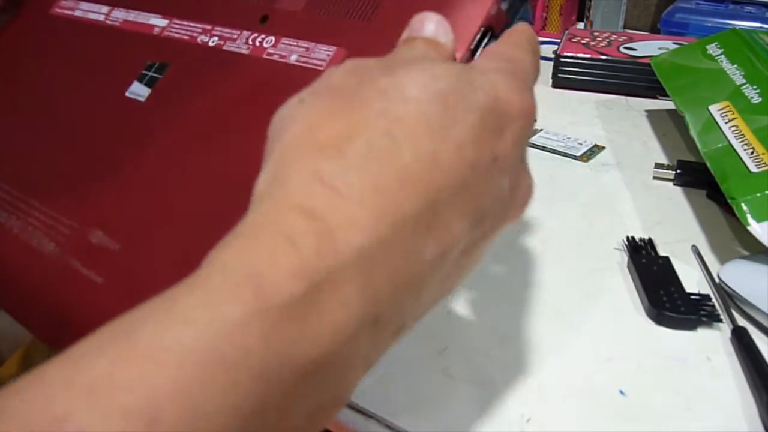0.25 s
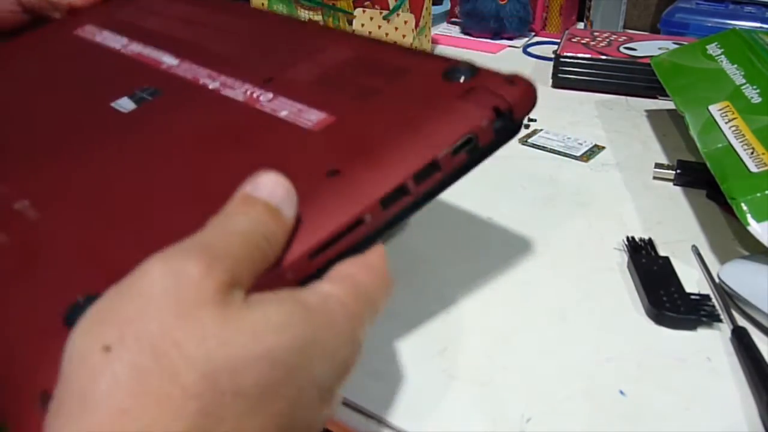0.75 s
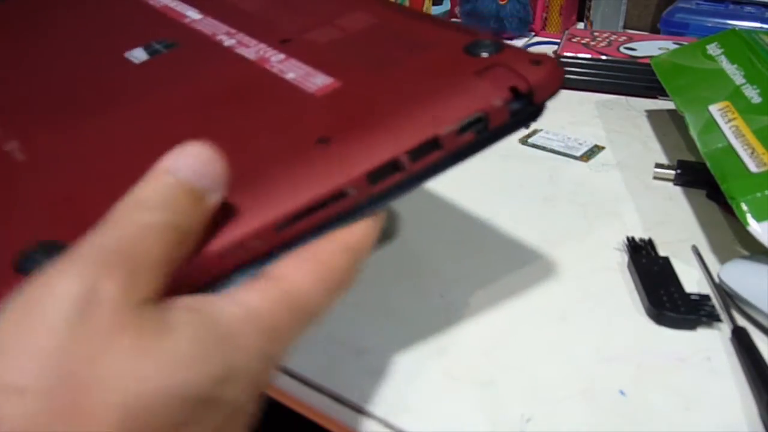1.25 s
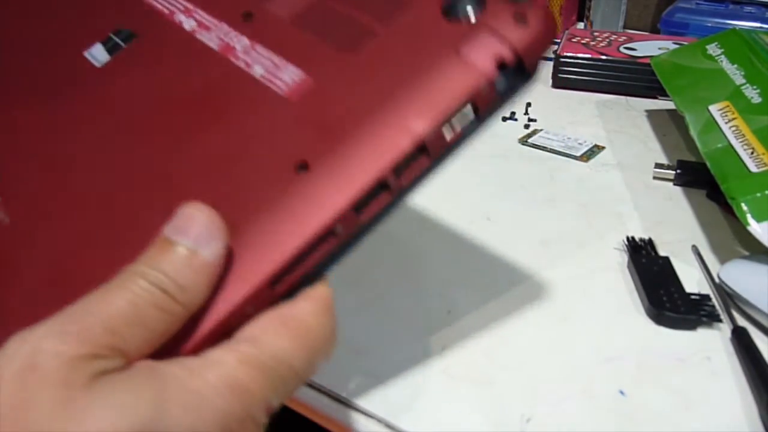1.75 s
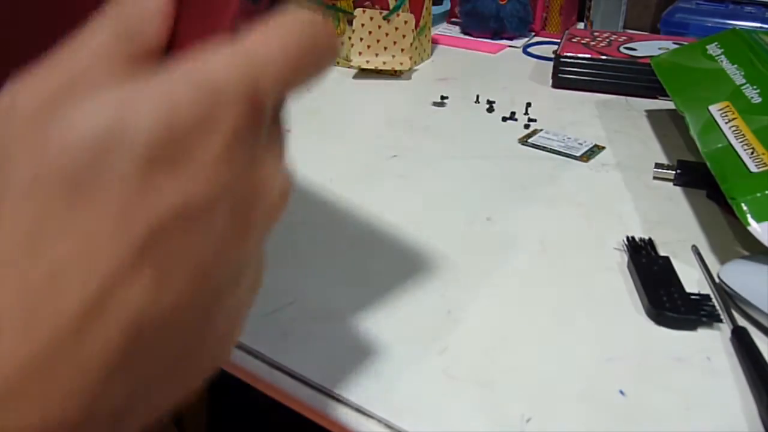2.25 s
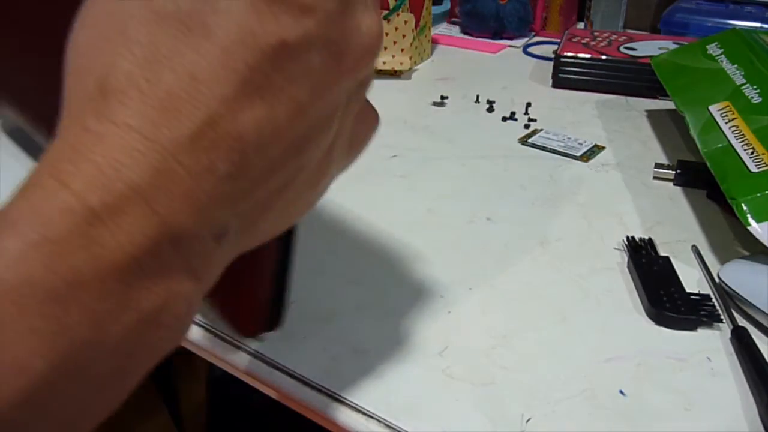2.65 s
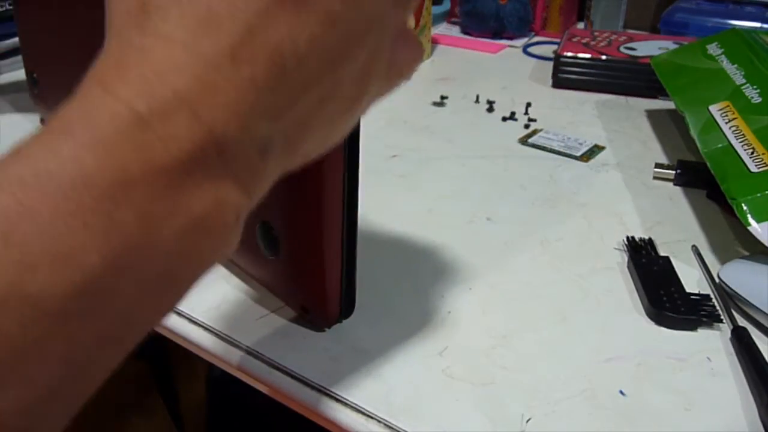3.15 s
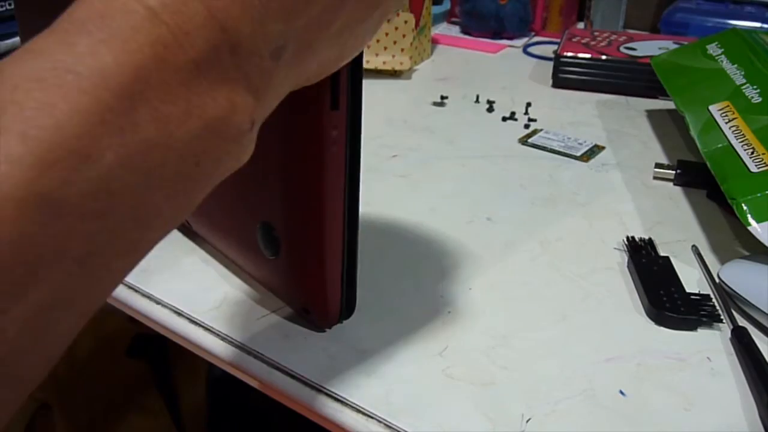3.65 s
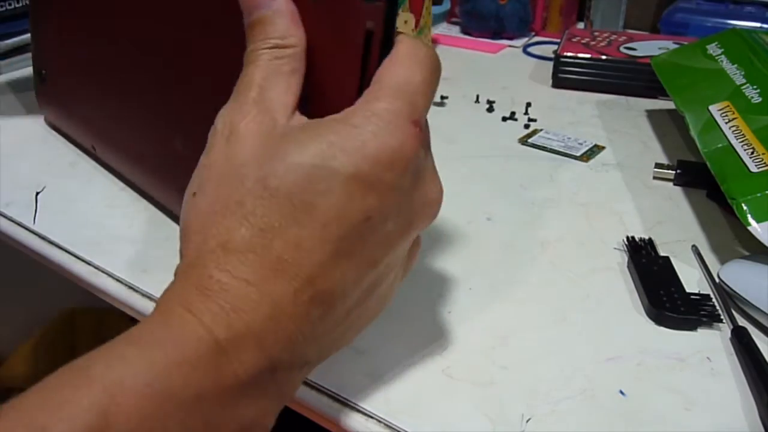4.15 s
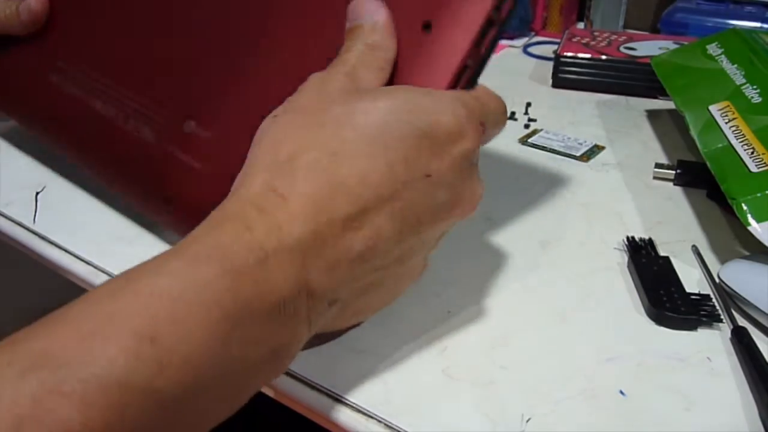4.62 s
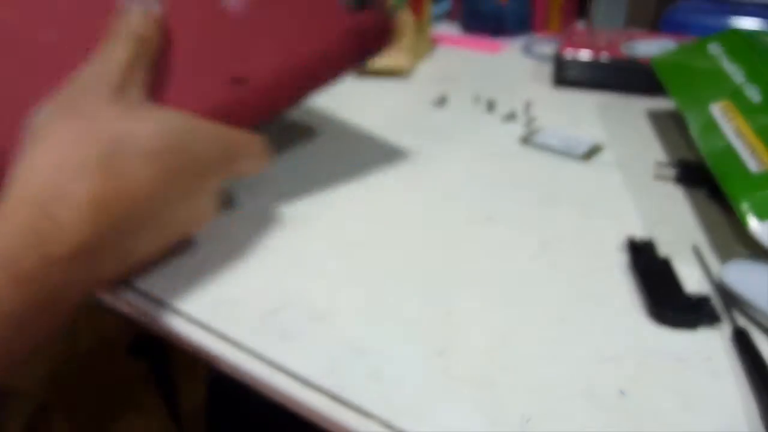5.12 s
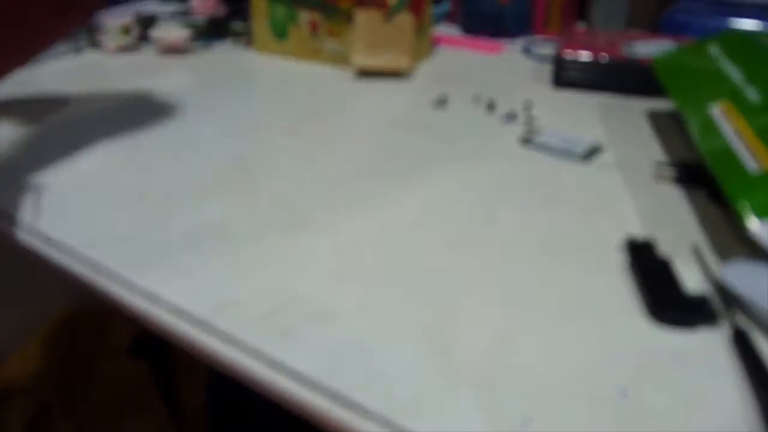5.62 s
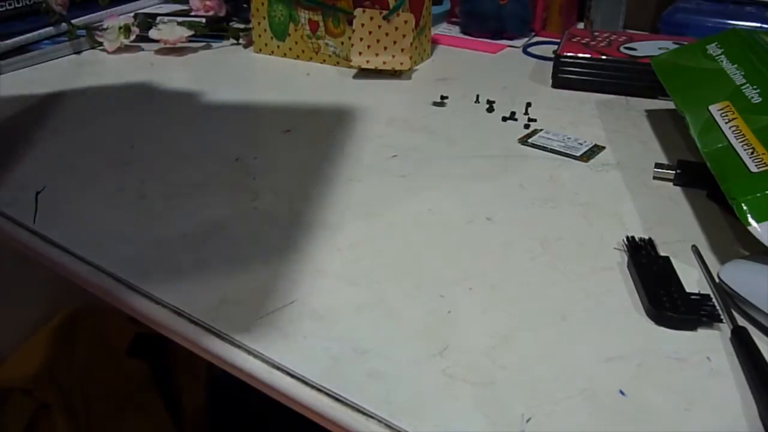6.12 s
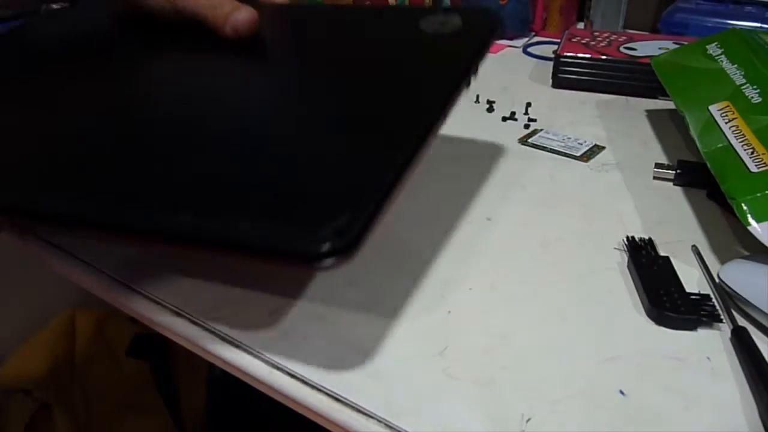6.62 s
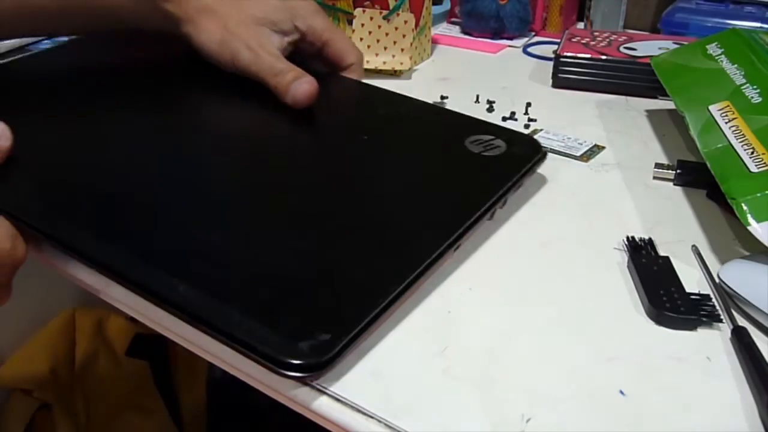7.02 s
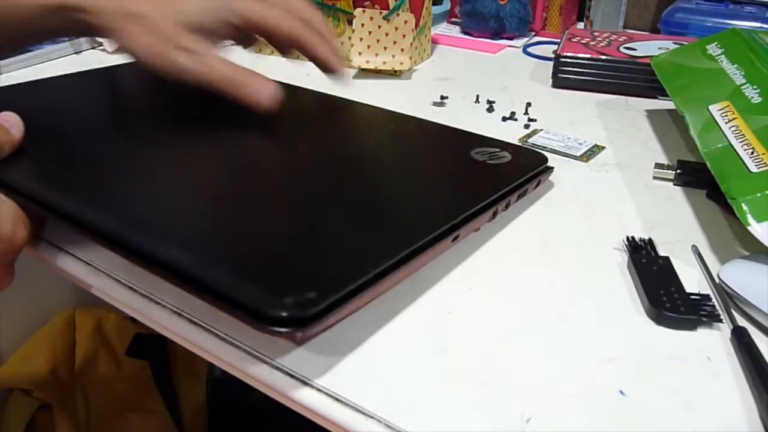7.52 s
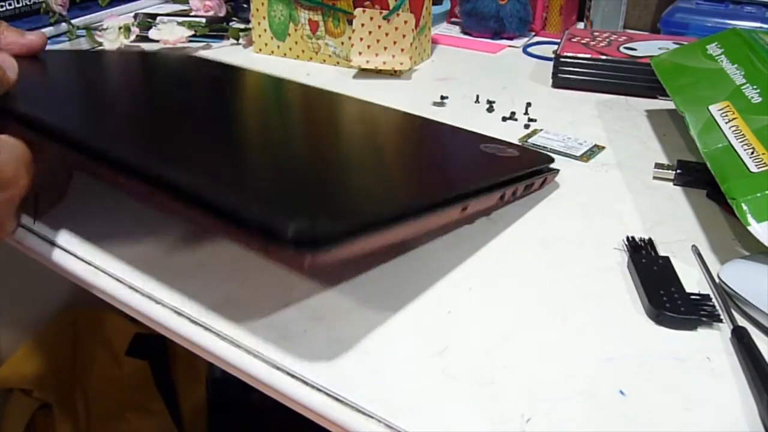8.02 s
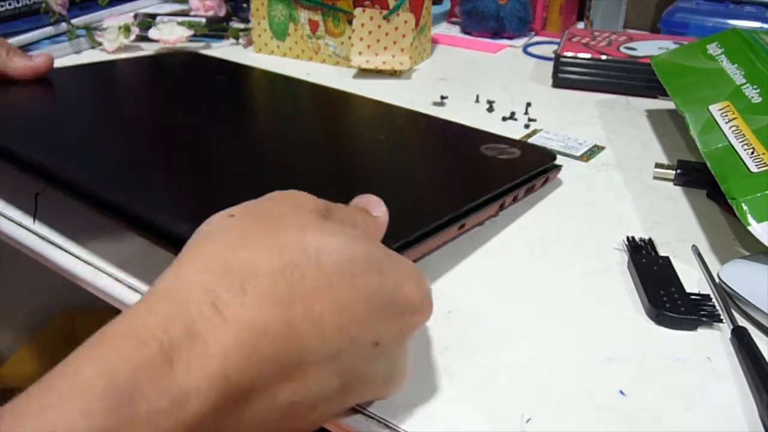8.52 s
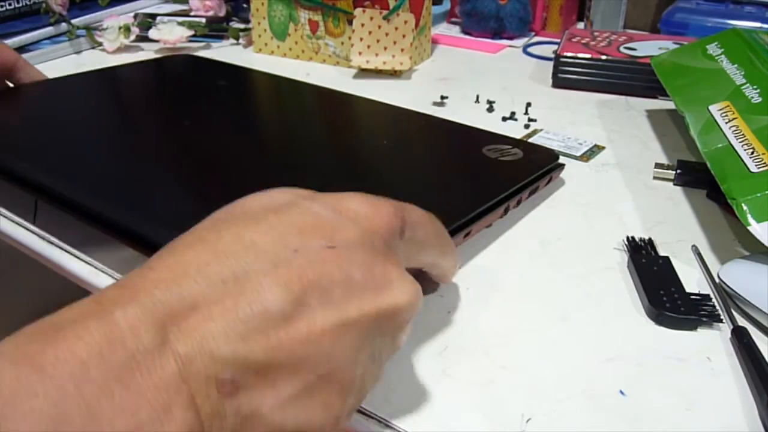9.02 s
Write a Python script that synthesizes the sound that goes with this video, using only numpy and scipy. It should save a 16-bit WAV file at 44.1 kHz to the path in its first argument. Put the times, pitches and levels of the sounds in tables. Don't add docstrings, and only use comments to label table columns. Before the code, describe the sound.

Close to a small microphone in a small room, hands turn a plastic laptop case. Light ticks and a sharp snap come first, then a boomy cluster of bumps as the edge meets the desk. Soft taps, rubbing and two more bright snaps follow. The case lands flat, settles and clatters loudly, then gives a few spaced knocks as one side is lifted. Faint fan hum and grainy hiss lie behind.

```python
import sys
import numpy as np
from scipy import signal
from scipy.fft import rfft, irfft, next_fast_len
from scipy.io import wavfile
from scipy.ndimage import map_coordinates

SR = 44100
rng = np.random.default_rng(int(sys.argv[2]) if len(sys.argv) > 2 else 0)


def linear_from_db(decibels):
    return 10 ** (np.asarray(decibels, float) / 20)


def bounce(signal):
    frames = np.transpose(np.atleast_2d(signal))
    limited = np.clip(frames, -1, 1)
    pcm = np.round(limited * 32767).astype(np.int16)
    wavfile.write(sys.argv[1], SR, pcm)


N = 408630
SIZE = 2 ** 15
HZ = np.fft.rfftfreq(SIZE, 1 / SR)

# (frequency [Hz], density [dB per Hz])
RUMBLE_COLOUR = [(18, -44.5), (30, -12.5), (42, -20), (69, -7.5), (114, -8.5), (194, -8), (300, -22.5),
                 (500, -60)]
AIR_COLOUR = [(100, -60.5), (200, -15), (260, -13), (405, -15), (790, -20), (1300, -24.5), (2500, -34),
              (7500, -49)]
RUMBLE_DB, AIR_DB = -66.5, -66.5
# (frequency [Hz], width [Hz], level [dB rms])
FAN_TONES = [(147.1, 12, -73), (226.7, 13, -68)]
# (frequency [Hz], level [dB], 4.5 dB below the peak of the tone)
WHINE_TONES = [(2665, -102.5), (6659, -88)]

# (frequency [Hz], density [dB per Hz])
SKIN_COLOUR = [(300, -36.5), (600, 6), (1000, 3.5), (1700, -4), (3000, -22), (6000, -41)]
SLIDE_COLOUR = [(600, -37), (1100, -1.5), (2200, 2), (3100, -8.5), (4500, -45)]
CREAK_COLOUR = [(120, -14), (250, 9.5), (400, 1.5), (700, -7.5), (1200, -44)]
# (start [s], length [s], level [dB])
HAND_SHIFTS = [(.8, .6, -80), (1.9, .5, -82.5), (2.72, 0.15, -73), (3.6, .5, -81.5), (4.4, 0.5, -71),
               (5.35, 0.84, -74.5), (6.6, .8, -77.5), (8.3, .3, -79), (4.35, .08, -63.5), (5.68, .07, -72)]
# (start [s], length [s], level [dB])
FINGER_SLIDES = [(4.34, .07, -67), (4.43, 0.047, -71), (4.5, .4, -80), (4.95, 0.22, -74), (5.72, .3, -72.5),
                 (5.9, .28, -70)]
# (start [s], length [s], level [dB])
CREAK_SWELLS = [(2.78, .32, -54.5), (3.9, 0.26, -70), (4.45, .25, -69), (5.15, 0.17, -72),
                (8.3, 0.23, -65.5)]
RISE_SHARE = .4
HOLD_DB = -69

# (frequency [Hz], t60 [s])
ROOM_DECAY = [(80, 0.089), (300, 0.17), (1000, 0.15), (3000, .14), (6000, 0.1)]
# (delay [ms], level [dB])
NEAR_WALLS = [(4, -18), (13, -24), (18, -15.5), (26, -20)]
# (delay [ms], level [dB])
FAR_WALLS = [(27, -7.5), (41, -9)]
# (frequency [Hz], level [dB])
WALL_COLOUR = [(50, 0), (3000, -5.5), (4200, -19.5), (8000, -0.5)]

# (time [s], peak near 900 Hz [dB], weight: low desk moved [dB], hardness of edge [dB])
EDGE_BUMPS = [(2.764, -29, -5, -18), (2.771, -30, -2, -22.5), (2.833, -24, -2, -12), (2.965, -36, 7, -10)]
FLAT_LANDING = [(6.955, -28, -17, -22.5)]
FLAT_SETTLING = [(7.148, -41.5, -25.5, -16.5), (7.152, -30.5, -24, -9), (7.159, -38, -8.5, -14)]
FLAT_CLATTER = [(7.465, -19, -15.5, -13), (7.494, -28.5, -8.5, -18), (7.54, -36, -12, -17.5),
                (7.611, -50, -6.5, -20.5)]
SIDE_CONTACTS = [(7.818, -61.5, 10.5, -11.5), (7.843, -46, -8, -11), (8.091, -29, -19.5, -17),
                 (8.282, -27.5, -18, -11.5), (8.517, -43, -18, -19), (8.53, -50, -7.5, -10.5),
                 (9.032, -32, -23, -16)]
SHELL_SNAPS = [
    (0.7793, -27.5, -38.5, -25.5),
    (5.3222, -21, -24, -11.5),
    (6.3486, -19, -41.5, -18),
]
# (time [s], peak [dB], pitch [Hz], second mode above or below [multiple of pitch], hardness
# [dB])
PART_TICKS = [(0.222, -38, 1020, 1.52, -17.5), (1.67, -37, 1150, 1.87, -20.5),
              (1.843, -50.5, 2100, 1.25, -8.5), (2.153, -45.5, 1600, 1.4, -5.5),
              (3.951, -48, 870, 1.45, -6), (4.407, -38, 1160, .7, -16.5), (5.001, -47, 1080, .75, -16),
              (6.469, -44, 1250, 1.75, -6.5), (7.974, -47.5, 1350, 1.45, -10.5),
              (7.444, -55.5, 1700, 1.3, -7.5), (4.377, -49, 1650, 1.3, -8), (.243, -50, 1020, 1.52, -17.5)]
FINGER_TAPS = [(0.748, -52, 950, 1.45, -15), (4.109, -40.5, 960, 1.5, -6.5), (4.848, -44.5, 873, 1.45, -18),
               (4.966, -57, 1225, 1.45, -10), (6.29, -46, 2130, .3, -6), (8.407, -46.5, 1090, 1.45, -8),
               (8.564, -49, 730, 1.45, -15), (5.687, -50.5, 1350, .6, -19.5)]
PAD_NUDGES = [(4.358, -44, 365, 2.2, -25), (4.373, -41, 240, 3.3, -25), (4.388, -39, 410, 2.1, -30),
              (4.447, -52, 299, 1.45, -19.5), (4.85, -41.5, 508, 1.45, -29.5), (4.892, -44, 331, 1.45, -35),
              (5.688, -38, 340, 1.7, -25), (5.712, -37.5, 310, 1.8, -27.5),
              (7.323, -55.5, 357, 1.45, -30.5), (7.845, -42, 439, 1.45, -30.5)]
# (frequency [Hz], level [dB], t60 [s])
DESK_MODES = [(78.6, 3.5, 0.4), (144, 3.5, 0.26), (205, 3.5, 0.17), (275.6, -2.5, 0.071), (388, 4.5, 0.13),
              (406, 4.5, 0.11), (444, 4, 0.072), (506, 6.5, 0.16), (666, -4.5, 0.05), (800, 3.5, .06),
              (1115, 1, 0.054), (1876, -1.5, 0.012), (3000, -5, 0.06)]
# (frequency [Hz], level [dB], t60 [s])
FLAT_MODES = [
    [(85, 14.5, 0.36), (239, 4, 0.067), (404, 3, 0.097), (488, 3.5, 0.091), (594, -4, .06), (870, 2, .04),
     (1210, -4, 0.027), (1570, -2, 0.05), (2290, 2.5, 0.073), (2850, -3, 0.016)],
    [(86.4, 4, 0.13), (131.4, 2, 0.068), (231, 4.5, 0.23), (289, 0.5, 0.092), (397, 2.5, 0.053),
     (656, -5, 0.064), (1350, -2.5, 0.0097), (1674, 1.5, 0.038), (2010, 4, 0.025), (3630, 1, 0.034)],
    [(80.8, 5.5, 0.13), (134, 7.5, 0.13), (233, -5.5, 0.088), (286, 1.5, 0.13), (423, 5, 0.044),
     (757, 2.5, 0.027), (1365, 6, 0.018), (1554, 4, 0.024), (2280, -12, 0.018), (3100, 4, 0.011)],
]
# (frequency [Hz], level [dB], t60 [s])
SHELL_MODES = [
    [(374, 1.5, 0.045), (505, -11.5, 0.076), (870, -2.5, 0.044), (1000, 2, 0.042), (1223, 6, 0.03),
     (1940, 5.5, 0.019), (2360, 11, 0.023), (2910, 5.5, .02)],
    [(252, -14, 0.022), (417, 1.5, 0.051), (637, -8, 0.036), (872, 3, 0.21), (980, -8, 0.045),
     (1440, 12.5, 0.091), (1730, 9, 0.03), (1990, -2, 0.033), (2380, 6.5, 0.017), (2670, 1, 0.02)],
    [(401, 4, .05), (504.5, 5, 0.07), (602, 2.5, .045), (798, 4.5, 0.052), (1114, -7, 0.055),
     (1411, 11.5, 0.053), (1730, 4, 0.013), (2320, 9.5, 0.013), (4700, 7.5, 0.007)],
]
SNAP_MS = [2.7, 1, 0.58]
SNAP_TOP_DB = [-11, -7, -11.5]
SNAP_BODY_DB = [2, -1, 5]
BODY_SHARE = .45
BLUR = .02


def unit(x):
    return x / np.sqrt(np.mean(x ** 2) + 1e-20)


def along(points, hz):
    f, v = np.transpose(points)
    return np.interp(np.log(hz + 1), np.log(f + 1), v)


def wobble(rate):
    knots = rng.standard_normal(int(N * rate / SR) + 4)
    return map_coordinates(knots, [np.arange(N) * rate / SR])


def noise(gain):
    m = next_fast_len(N)
    spectrum = rfft(rng.standard_normal(m)) * gain(np.fft.rfftfreq(m, 1 / SR))
    return unit(irfft(spectrum, m)[:N])


def coloured(points):
    return noise(lambda hz: linear_from_db(along(points, hz)))


def room_tone():
    return linear_from_db(AIR_DB) * coloured(AIR_COLOUR) + linear_from_db(RUMBLE_DB) * coloured(RUMBLE_COLOUR)


def fan():
    def hum(hz, width):
        return noise(lambda f: 1 / (1 + ((f - hz) / (width / 2)) ** 2))
    return sum(linear_from_db(db) * hum(hz, width) for hz, width, db in FAN_TONES)


def whine():
    t = np.arange(N) / SR
    return sum(linear_from_db(db + 4.5) * np.sin(2 * np.pi * hz * t) for hz, db in WHINE_TONES)


def strokes(rows):
    t = np.arange(N) / SR
    gain = 0
    for start, length, db in rows:
        swell = np.interp(t, [start, start + RISE_SHARE * length, start + length], [0, 1, 0])
        gain = gain + linear_from_db(db) * np.sin(np.pi / 2 * swell)
    return gain


def rubbing():
    grain = linear_from_db(1.5 * wobble(80))
    skin = strokes(HAND_SHIFTS) * coloured(SKIN_COLOUR)
    swish = strokes(FINGER_SLIDES) * coloured(SLIDE_COLOUR)
    return grain * (skin + swish)


def creaking():
    creak = unit(linear_from_db(2.5 * wobble(25)) * coloured(CREAK_COLOUR))
    return (linear_from_db(HOLD_DB) + strokes(CREAK_SWELLS)) * creak


def causal(gain):
    cep = irfft(np.log(gain + 1e-9), SIZE)
    cep[1:SIZE // 2] *= 2
    cep[SIZE // 2 + 1:] = 0
    return np.exp(rfft(cep))


def room(tail_db):
    half = SIZE // 2
    hz, t, z = signal.stft(rng.standard_normal(half), SR, nperseg=256)
    fade = linear_from_db(-60 * t / along(ROOM_DECAY, hz)[:, None])
    tail = signal.istft(z * fade, SR, nperseg=256)[1][:half]
    tail *= 1 - np.exp(-np.arange(half) / SR / 0.0009)
    answer = linear_from_db(tail_db) * tail / np.linalg.norm(tail)
    for ms, db in NEAR_WALLS:
        answer[round(ms * SR / 1000)] += linear_from_db(db)
    near = rfft(answer, SIZE) * linear_from_db(along(WALL_COLOUR, HZ))
    late = sum(linear_from_db(db) * np.exp(-2j * np.pi * HZ * ms / 1000) for ms, db in FAR_WALLS)
    low_band = 1 + (np.log(HZ / 230 + 1e-9) / 0.44) ** 4
    return 1 + near + late / low_band


def chattering_push(ms):
    u = np.arange(SIZE // 2) / SR * 1000 / ms
    chatter = rfft(rng.standard_normal(SIZE // 2) * u * np.exp(-2 * u), SIZE)
    even = irfft(chatter / causal(abs(chatter)), SIZE)[:SIZE // 2]
    return rfft(even * np.exp(-(u / 4) ** 2), SIZE)


def ringing(modes, ring_db):
    t = np.arange(SIZE // 2) / SR
    hz, level, t60 = np.transpose(modes)[..., None]
    fade = linear_from_db(-60 * t / np.clip(t60, .005, .5))
    height = linear_from_db(ring_db + level + rng.standard_normal(hz.shape)) * 2 / fade.sum(axis=1, keepdims=True)
    drift = np.cumsum(rng.standard_normal(fade.shape), axis=1) * np.sqrt(2 * np.pi * BLUR * hz / SR)
    ring = np.sum(height * fade * np.cos(2 * np.pi * hz * t + drift), axis=0)
    ring[0] = 1
    return rfft(ring, SIZE)


def contact(out_s, db, ms, colour, modes, ring_db, tail_db):
    struck = chattering_push(ms) * ringing(modes, ring_db)
    sound = irfft(struck * causal(linear_from_db(along(colour, HZ))) * room(tail_db), SIZE)
    return np.pad(linear_from_db(db) * sound, (round(out_s * SR), N))[:N]


def blow(boom_db, body_db, edge_db, top_db):
    top = edge_db + top_db
    return [(25, boom_db - 9.0), (75, boom_db + 20.5), (150, boom_db + 22.0), (360, body_db + 17.0),
            (900, 6), (2800, edge_db + 4.5), (3300, edge_db), (4200, top), (7000, top - 8), (7600, -81.5)]


def heavy(events, modes, ms, body_db, gain_db, top_db, ring_db, tail_db):
    total = 0
    for s, db, weight, hard in events:
        colour = blow(weight, body_db + BODY_SHARE * weight, hard, top_db)
        total = total + contact(s, db + gain_db, ms, colour, modes, ring_db, tail_db)
    return total


def light(events, ms, gain_db, body_db, ring_db, t60):
    total = 0
    for s, db, hz, over, hard in events:
        part = [(hz, 0, t60), (over * hz, -3, t60)]
        colour = [(30, body_db - 20), (hz / 3, body_db + 9), (hz, 5),
                  (2900, hard + 3), (3700, hard - 12), (7600, -60)]
        total = total + contact(s, db + gain_db, ms, colour, part, ring_db, tail_db=-9)
    return total


def loose_parts():
    ticks = light(PART_TICKS, ms=1.4, gain_db=15, body_db=-22.5, ring_db=10, t60=0.009)
    taps = light(FINGER_TAPS, ms=1.6, gain_db=16, body_db=-11.5, ring_db=11, t60=0.014)
    nudges = light(PAD_NUDGES, ms=6.4, gain_db=24.5, body_db=-12, ring_db=10.5, t60=0.075)
    return ticks + taps + nudges


def snaps():
    grips = zip(SHELL_SNAPS, SHELL_MODES, SNAP_MS, SNAP_TOP_DB, SNAP_BODY_DB)
    return sum(heavy([snap], modes, ms=ms, body_db=body_db, gain_db=26, top_db=top_db, ring_db=-2.0, tail_db=-6.0)
               for snap, modes, ms, top_db, body_db in grips)


def desk_contacts():
    landed, flat, lifted = FLAT_MODES
    bumps = heavy(EDGE_BUMPS, DESK_MODES, ms=3.6, body_db=5.0, gain_db=21.0, top_db=-21.5,
                  ring_db=1.0, tail_db=-1.0)
    landing = heavy(FLAT_LANDING, landed, ms=3.7, body_db=-4.5, gain_db=20.0, top_db=-15.5,
                    ring_db=2.5, tail_db=-1.5)
    settling = heavy(FLAT_SETTLING, landed, ms=2.8, body_db=-1.5, gain_db=21, top_db=-13.5,
                     ring_db=4.5, tail_db=-2.5)
    clatter = heavy(FLAT_CLATTER, flat, ms=4.2, body_db=-3.5, gain_db=20, top_db=-16.5,
                    ring_db=5.0, tail_db=-4.5)
    lifting = heavy(SIDE_CONTACTS, lifted, ms=2.3, body_db=1.5, gain_db=17.5, top_db=-13,
                    ring_db=1.5, tail_db=-1.0)
    return bumps + landing + settling + clatter + lifting


def scene():
    background = room_tone() + fan() + whine()
    hands = rubbing() + creaking()
    laptop = loose_parts() + snaps() + desk_contacts()
    return (background + hands + laptop)[None]


def roll_off(x):
    return signal.sosfilt(signal.butter(12, 7510, fs=SR, output="sos"), x)


def record(dry):
    step, offset = 1 / 1024, -.0057
    slow = signal.resample_poly(dry, 160, 441, axis=1)
    rounded = np.round((slow + offset) / step) * step - offset
    fast = signal.resample_poly(rounded, 441, 160, axis=1, window=("kaiser", 9))[:, :N]
    edge = signal.butter(8, 6980, fs=SR, output="sos")
    mix = signal.sosfiltfilt(edge, fast) + offset
    return roll_off(mix)


dry = scene()
out = record(dry)
bounce(out)
```